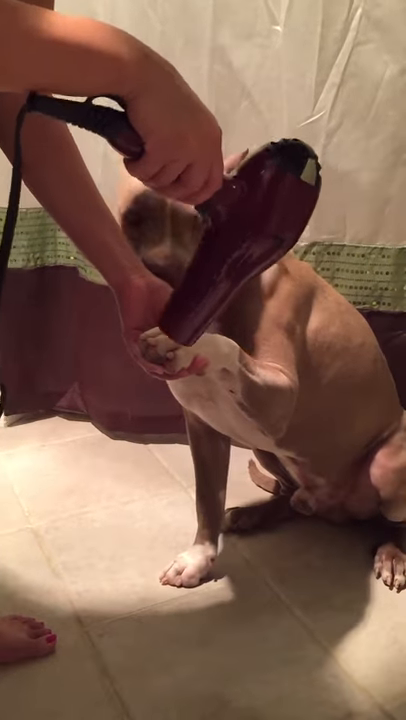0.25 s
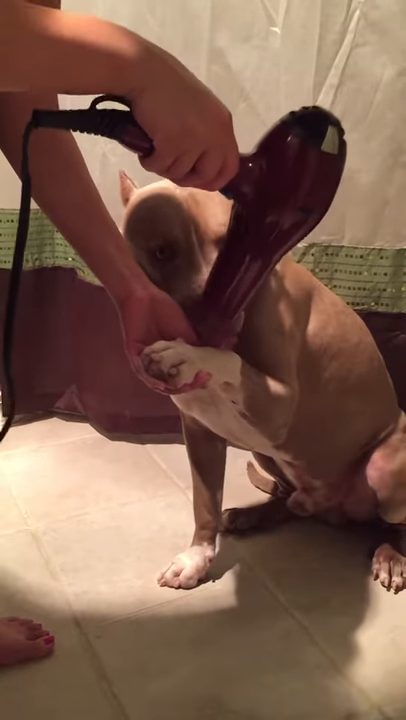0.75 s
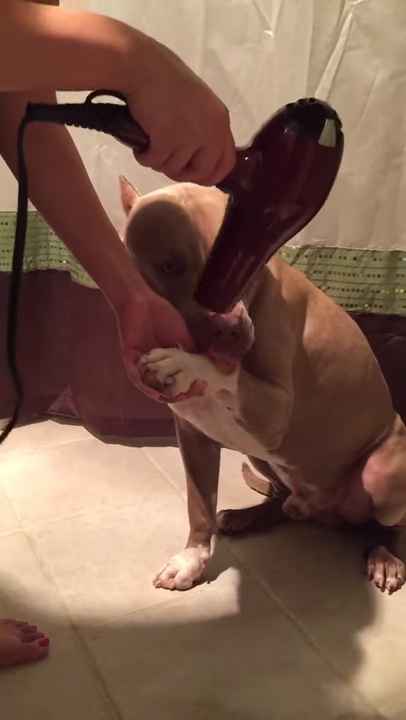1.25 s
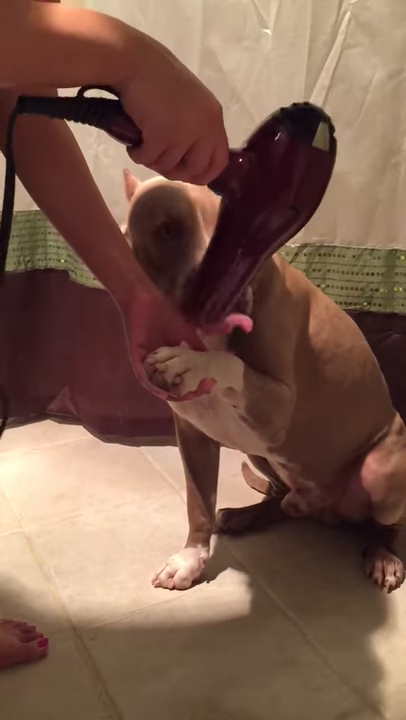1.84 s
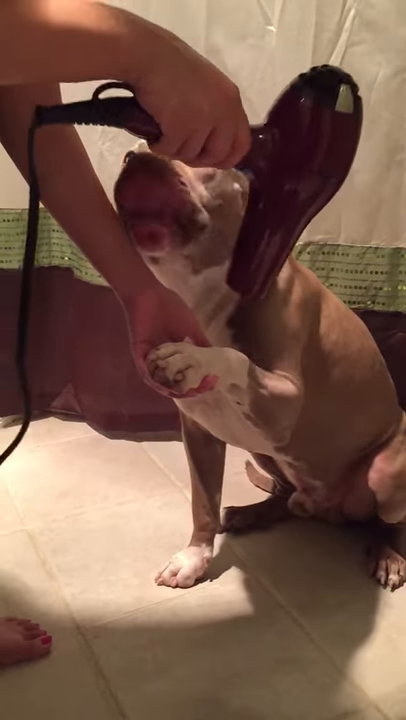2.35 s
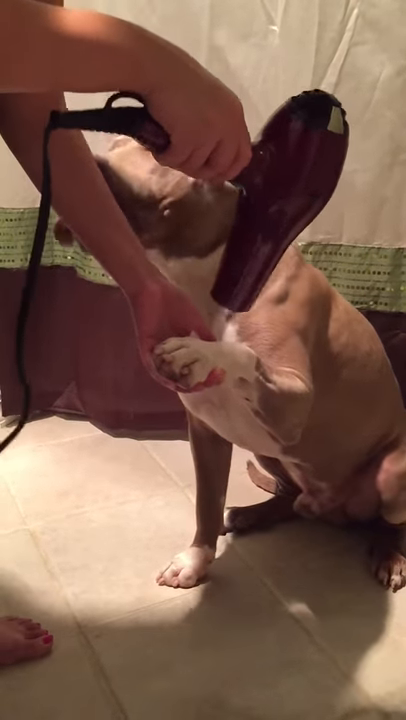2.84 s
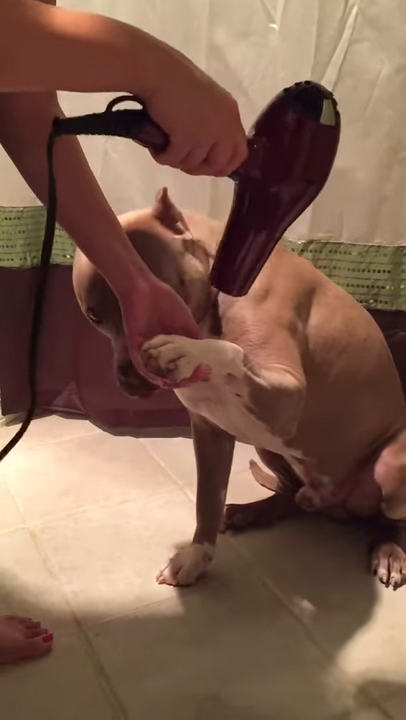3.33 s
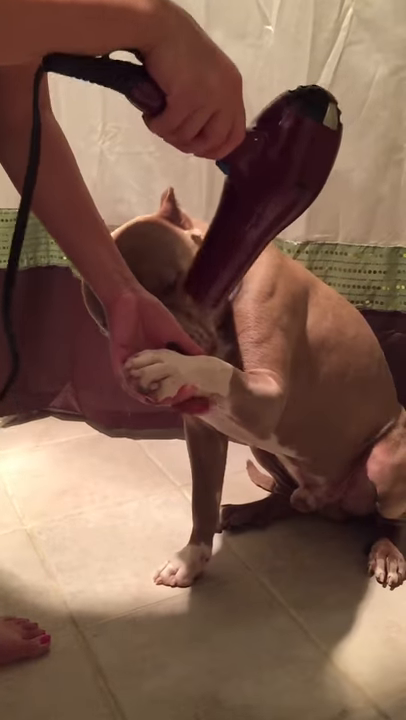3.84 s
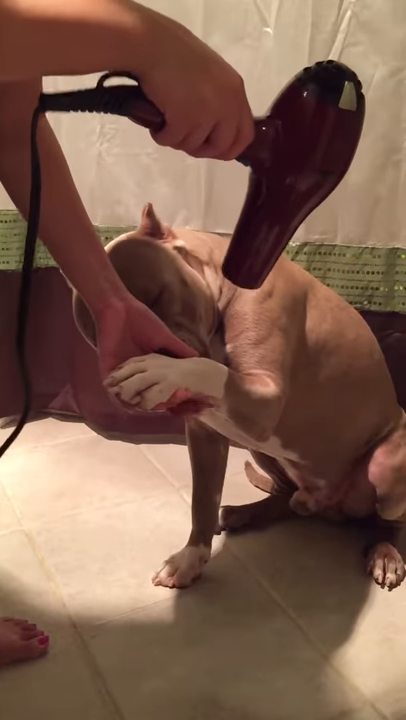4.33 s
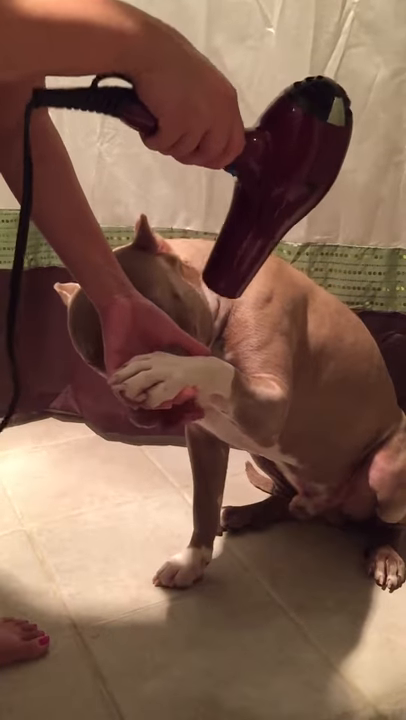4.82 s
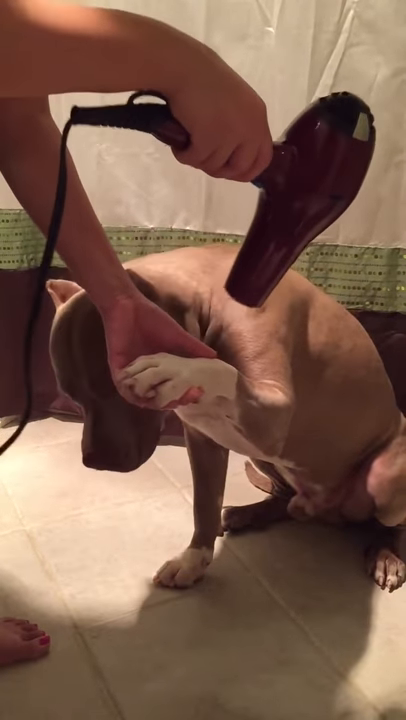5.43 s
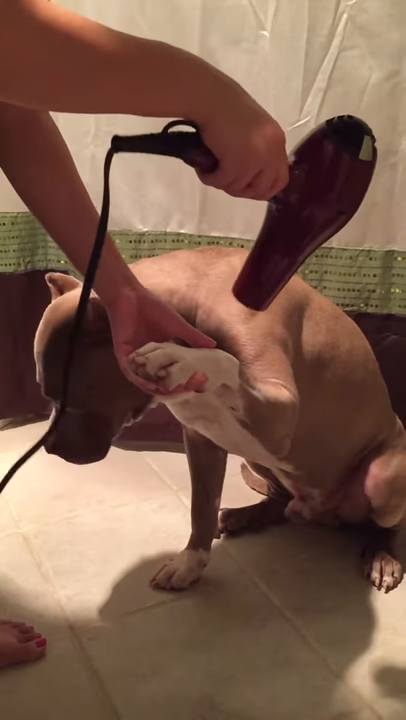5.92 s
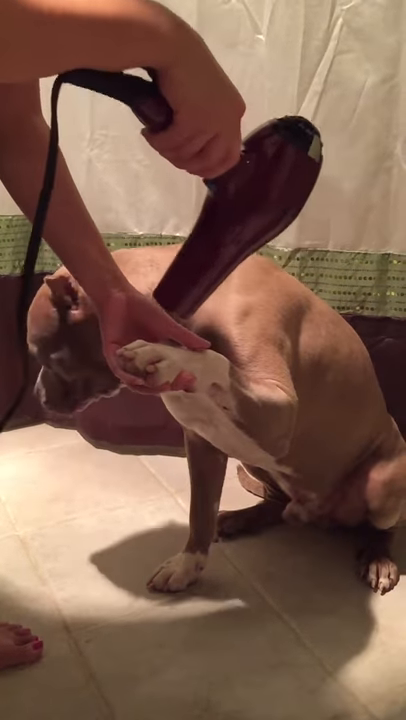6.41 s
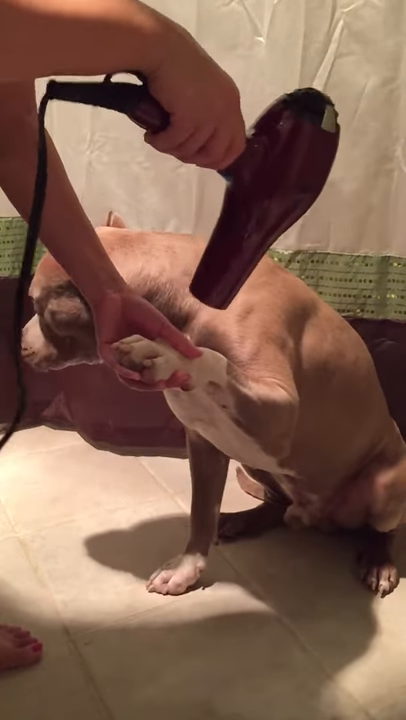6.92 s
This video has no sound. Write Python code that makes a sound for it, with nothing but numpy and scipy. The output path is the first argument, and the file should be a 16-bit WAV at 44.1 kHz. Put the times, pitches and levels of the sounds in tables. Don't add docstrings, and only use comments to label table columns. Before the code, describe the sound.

A hair dryer is already running and never stops: a dense mid-range roar of air, a raspy edge and a bright hiss at the nozzle, with a nearly pure high fan whine on top. The small tiled bathroom colours it with hollow resonances. Slight hand movements make the parts swell and fade, and low wind buffets briefly rise as the jet meets the dog's coat. One phone microphone, close, essentially mono.

```python
import sys
import numpy as np
from scipy import signal
from scipy.fft import rfft, irfft, next_fast_len
from scipy.io import wavfile
from scipy.ndimage import uniform_filter1d, map_coordinates

SR = 44100
rng = np.random.default_rng(int(sys.argv[2]) if len(sys.argv) > 2 else 0)


def gain_from_decibels(decibels):
    exponent = np.asarray(decibels, float) / 20
    return 10 ** exponent


def store_pcm(level_fs):
    pcm = np.round(np.clip(level_fs, -1, 1) * 32767).astype(np.int16)
    wavfile.write(sys.argv[1], SR, np.atleast_2d(pcm).T)


N = 316180


def unit(x):
    return x / np.sqrt(np.mean(x ** 2) + 1e-20)


def along(points, hz):
    f, value = np.transpose(points)
    return np.interp(np.log(hz + 1), np.log(f + 1), value)


def wobble(rate):
    knots = rng.standard_normal(int(N * rate / SR) + 4)
    return map_coordinates(knots, [np.arange(N) * rate / SR])


def swells(rows):
    t = np.arange(N) / SR
    return sum(db * np.exp(-((t - s) / half) ** 2) for s, db, half in rows)


def filtered(x, response):
    m = next_fast_len(N + 8192)
    return irfft(rfft(x, m) * response(np.fft.rfftfreq(m, 1 / SR)), m)[:N]


ZONE_EDGES = (10, 187, 485, 1800, 3300, 9000, 15750)


def zone_share(hz, zone):
    def rise(edge):
        return np.clip(.5 + (hz / edge - 1) * 12, 0, 1)
    return np.sqrt(rise(ZONE_EDGES[zone]) * (1 - rise(ZONE_EDGES[zone + 1])))


def turbulence(patchy_db):
    z = signal.stft(rng.standard_normal(N + 1024), nperseg=512)[2]
    patches = uniform_filter1d(rng.standard_normal(z.shape), size=5, axis=0)
    patches = uniform_filter1d(patches, size=16, axis=1)
    return signal.istft(z * gain_from_decibels(patchy_db * unit(patches)), nperseg=512)[1][:N]


# (time [s], buffet level [dB], half length [s])
GUSTS = [(.33, 1, .04), (1.2, 2.5, .15), (2.2, 2, .3), (3.0, -3, .25), (3.75, -4, .2), (4.35, 8, 0.23),
         (5.3, 6.5, .15), (5.53, 13, 0.037), (5.75, 4, 0.091), (6.45, 4, .1), (7.1, 4, .1)]
# (time [s], hum level [dB], half length [s])
NEARING = [
    (.05, 2, .1),
    (.35, -4, .1),
    (1.15, 1.5, 0.22),
    (1.55, -3, .12),
    (2.9, 2, 0.87),
    (5.1, -1, .3),
    (6.3, 1, 0.49),
]
# (time [s], roar level [dB], rasp level [dB], half length [s])
TIPPING = [
    (.33, 1, 2, 0.045),
    (1.8, 1, -0.5, 0.16),
    (2.3, 1.5, .5, 0.19),
    (3.75, -0.5, .5, 0.33),
    (4.25, 0, -0.5, .15),
    (4.7, 1, 0.5, 0.22),
    (5.55, -.5, -1, 0.13),
    (5.95, -1, -1.5, 0.22),
    (6.35, -0.5, -2, 0.21),
    (7.0, -0.5, 1, 0.14),
]
HAND_DRIFT = (1.0, 0.31, 0.15, 0.23)


def barrel_air():
    air = scattered(turbulence(patchy_db=0.67))
    s, roar_db, rasp_db, half = np.transpose(TIPPING)
    levels = (-56 + swells(GUSTS),
              -45 + swells(NEARING),
              -30.5 + swells(zip(s, roar_db, half)),
              -32.5 + swells(zip(s, rasp_db, half)))
    body = np.zeros(N)
    for zone, (level_db, drift_db) in enumerate(zip(levels, HAND_DRIFT)):
        sound = unit(filtered(air, lambda hz: bathroom(hz) * zone_share(hz, zone)))
        body += gain_from_decibels(level_db + drift_db * wobble(3.03)) * sound
    return body


# (frequency [Hz], level per Hz [dB])
HISS_COLOUR = [(2500, -6), (3000, 11), (3250, 1), (3800, -4.5), (4150, -0.5), (4400, -2.5), (4620, 0),
               (4880, -8), (5000, -9.5), (5200, -1.5), (5700, -4.5), (5900, -3), (7150, -4), (7450, -9.5),
               (10000, -9.5)]
# (frequency [Hz], level per Hz [dB])
FIZZ_COLOUR = [(8000, -2), (9200, -2.5), (9900, 0), (10450, -6.5), (10900, -1), (11600, -2), (12100, -5.5),
               (12500, -2.5), (13500, -5), (14500, -5), (15700, -5)]


def nozzle_jet():
    jet = scattered(turbulence(patchy_db=0.8))
    jet_db = -34 + .2 * wobble(5)
    hiss = unit(filtered(jet, lambda hz: gain_from_decibels(along(HISS_COLOUR, hz)) * zone_share(hz, 4)))
    fizz = unit(filtered(jet, lambda hz: gain_from_decibels(along(FIZZ_COLOUR, hz)) * zone_share(hz, 5)))
    hiss_gain = gain_from_decibels(jet_db + .3 * wobble(12))
    fizz_gain = gain_from_decibels(jet_db - 9.83 + .3 * wobble(25))
    return hiss_gain * hiss + fizz_gain * fizz


# (time [s], passing rate [Hz], tone level [dB])
BLADES = [(0.0, 1773.5, -39), (0.17, 1775, -36), (0.33, 1774.6, -42), (0.5, 1775.5, -37),
          (1.1, 1781.5, -37.5), (1.6, 1782, -35.5), (2.2, 1785, -41), (2.85, 1788, -34.5),
          (3.2, 1788.5, -34), (3.4, 1793, -37), (3.85, 1795, -35), (4.0, 1792.6, -42), (4.5, 1790.5, -42),
          (4.75, 1788.6, -37), (5.7, 1787.5, -31.5), (6.02, 1787, -36.5), (6.58, 1783, -30.5),
          (7.17, 1783, -36)]
OVERTONES = (-52.5, -55.5)
# (time [s], second harmonic level [dB], third harmonic level [dB])
FACING = [
    (1.1, 4, 9),
    (1.95, 1, 11),
    (2.35, 5, 5),
    (2.85, -5, 3),
    (3.35, 6, 5),
    (4.25, 9, -2),
    (4.75, 3, 8),
    (5.5, 7, 5),
    (6.1, 2, -3),
    (6.85, 1, 5),
]


def blade_whine():
    s, rate_hz, tone_db = np.transpose(BLADES)
    t = np.arange(N) / SR
    turn = 2 * np.pi * np.cumsum(np.interp(t, s, rate_hz)) / SR
    levels = [np.interp(t, s, tone_db)]
    for k, rest_db in enumerate(OVERTONES):
        turns = [(row[0], row[k + 1], 0.19) for row in FACING]
        levels.append(rest_db + swells(turns))
    whine = np.zeros(N)
    for k, level_db in enumerate(levels):
        gain = np.sqrt(2) * gain_from_decibels(level_db + (.3 + 1.5 * k) * wobble(12))
        blur = (.05 + .4 * k) * wobble(30)
        whine += gain * np.sin((k + 1) * turn + blur)
    return whine


# (frequency [Hz], width [Hz], level [dB])
TILE_WAVES = [(90, 14, -19.6), (151, 27, -20.8), (232, 43, -10.3), (292, 45, -13.9), (465, 18, -15.9),
              (515, 29, -7.2), (576, 15, -0.2), (627, 68, -1.9), (662, 14, -7.7), (743, 17, -3.3),
              (784, 36, -5.2), (845, 23, -6.5), (889, 48, -5.3), (945, 42, -8.0), (1008, 99, -5.5),
              (1113, 18, -8.4), (1191, 33, -6.5), (1334, 58, -8.7), (1369, 20, -4.5), (1438, 116, -10.1),
              (1851, 15, -6.0), (1934, 90, -8.6), (1996, 35, -9.5), (2075, 39, -12.2), (2150, 36, -11.4),
              (2419, 141, -12.5), (2583, 161, -9.4), (2723, 156, -7.3), (2841, 33, -12.2),
              (3108, 145, -15.0)]
# (frequency [Hz], level per Hz [dB])
BARREL_COLOUR = [(25, -52.4), (80, -19.8), (180, -28.3), (330, -21.5), (440, -20.5), (545, -27),
                 (720, -16.5), (1150, -14.4), (1700, -12), (1850, -10.5), (2280, -17.4), (2900, -16.4),
                 (3250, -13), (3600, -18.4)]


def bathroom(hz):
    power = gain_from_decibels(2 * along(BARREL_COLOUR, hz))
    for centre, width, db in TILE_WAVES:
        power = power + gain_from_decibels(2 * db) / (1 + (2 * (hz - centre) / width) ** 2) ** 2
    return np.sqrt(power)


# (frequency [Hz], level [dB])
ECHOES = [
    (100, -20),
    (700, -15),
    (1500, -12),
    (3000, -8.5),
    (6000, -10),
    (9000, -12.5),
    (14000, -17),
]


def scattered(x):
    hz, _, z = signal.stft(x, SR, nperseg=4096)
    comb = rng.standard_normal((2, *z.shape))
    comb = uniform_filter1d(comb, size=3, axis=1)
    comb = unit(uniform_filter1d(comb, size=10, axis=2))
    echo_db = along(ECHOES, hz)
    gain = np.abs(1 + gain_from_decibels(echo_db)[:, None] * (comb[0] + 1j * comb[1]))
    gain /= np.sqrt(1 + 2 * gain_from_decibels(2 * echo_db))[:, None]
    return signal.istft(z * gain, SR, nperseg=4096)[1][:len(x)]


def scene():
    return np.tile(barrel_air() + nozzle_jet() + blade_whine(), (2, 1))


# (time [s], lowest frequency [Hz], highest frequency [Hz])
SLIPS = [(0.039, 9000, 9800), (0.086, 12600, 13800), (0.248, 6600, 13800), (0.387, 5200, 6300),
         (0.434, 11700, 15800), (0.991, 14500, 15800), (1.712, 4500, 14500), (1.826, 6300, 7600),
         (2.64, 4200, 5700), (3.057, 4580, 6860), (3.895, 4570, 13200), (4.683, 7700, 9000),
         (4.799, 13800, 15200), (5.402, 6230, 15800), (6.03, 11700, 12800), (6.261, 10400, 11700),
         (6.4, 4200, 10400), (6.54, 11300, 12400), (7.122, 6300, 7700)]


def side_slips(mono):
    side = np.zeros(N + 2048)
    fade = np.pad(signal.windows.tukey(1200, .6), 424)
    hz = np.fft.rfftfreq(2048, 1 / SR)
    band_hz, share = 1380, .25
    for s, low_hz, high_hz in SLIPS:
        at = round(s * SR) - 1024
        strength = np.abs(rfft(mono[at:at + 2048], 2048))
        noise = strength * np.exp(2j * np.pi * rng.random(len(hz)))
        chosen = (rng.random(32) < share)[(hz // band_hz).astype(int)]
        chosen = chosen | (hz < low_hz + band_hz) | (hz > high_hz - band_hz)
        side[at:at + 2048] += fade * irfft(noise * chosen * (hz > low_hz) * (hz < high_hz))
    return side[:N]


def top_cut(x):
    return signal.sosfilt(signal.butter(12, 15725, fs=SR, output="sos"), x)


def record(dry):
    mix = dry + np.outer([1, -1], side_slips(dry[0]))
    return top_cut(mix)


dry = scene()
out = record(dry)
store_pcm(out)
```